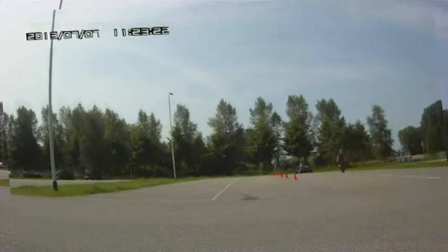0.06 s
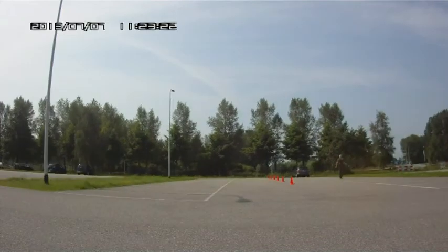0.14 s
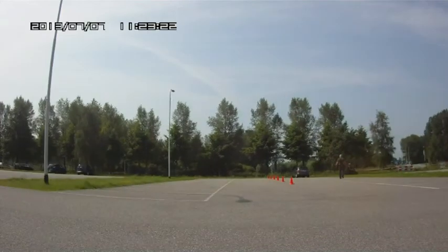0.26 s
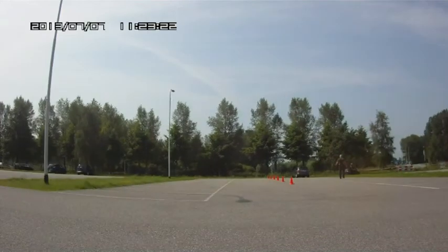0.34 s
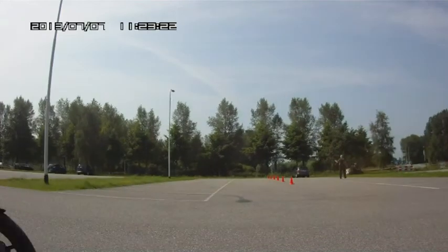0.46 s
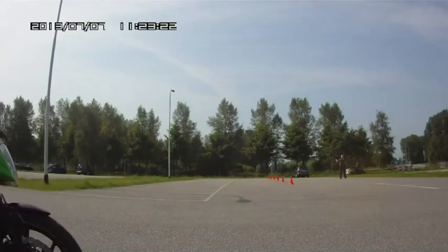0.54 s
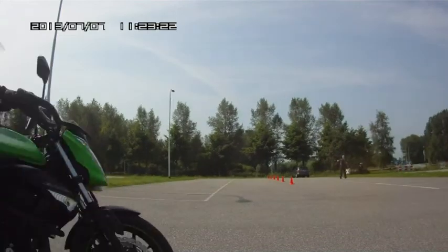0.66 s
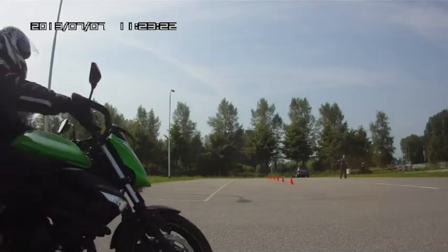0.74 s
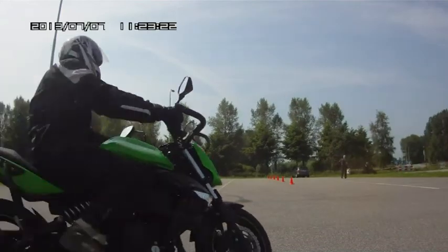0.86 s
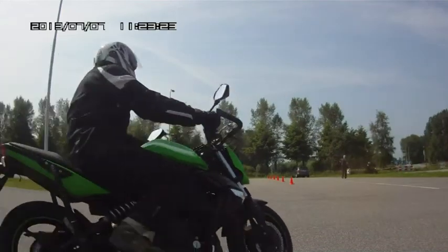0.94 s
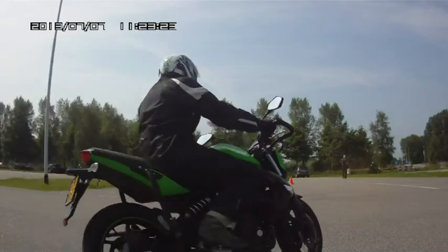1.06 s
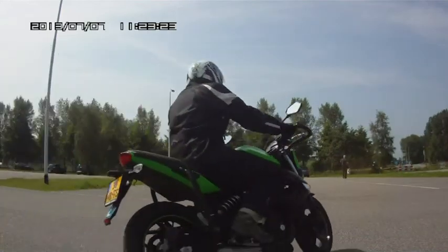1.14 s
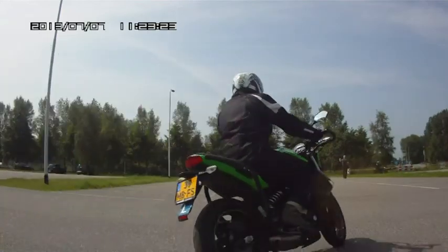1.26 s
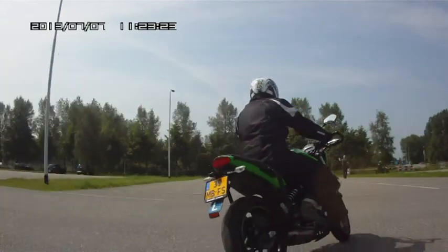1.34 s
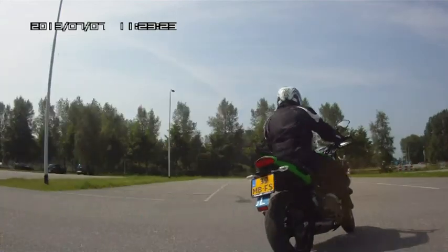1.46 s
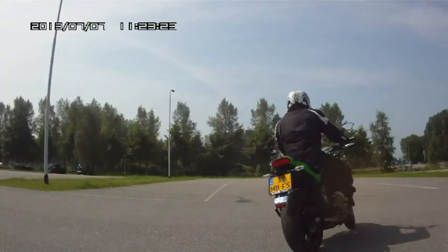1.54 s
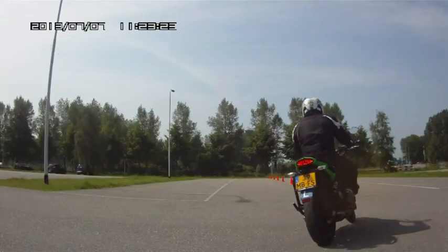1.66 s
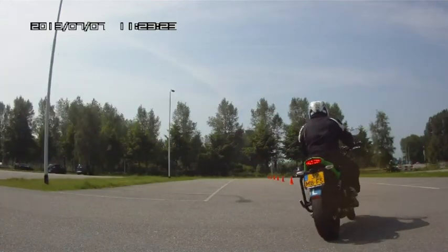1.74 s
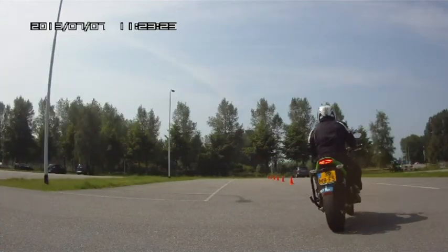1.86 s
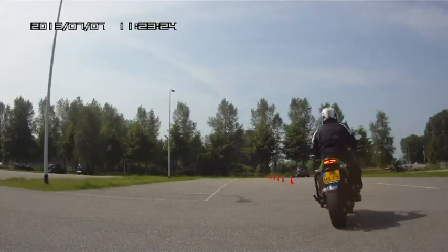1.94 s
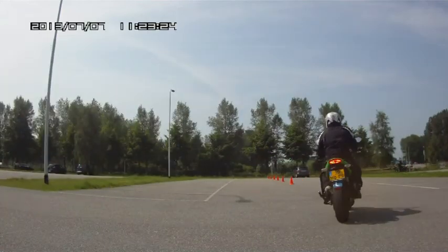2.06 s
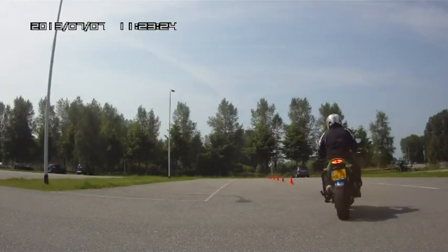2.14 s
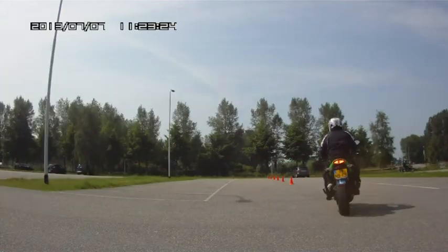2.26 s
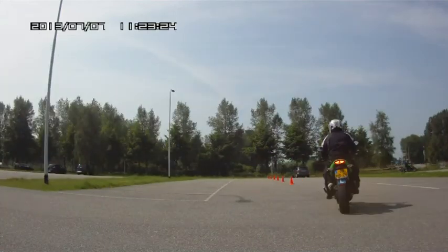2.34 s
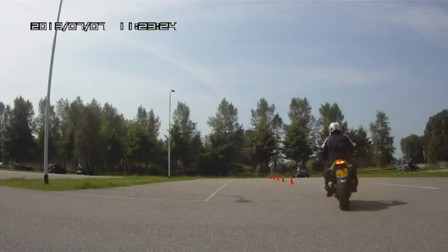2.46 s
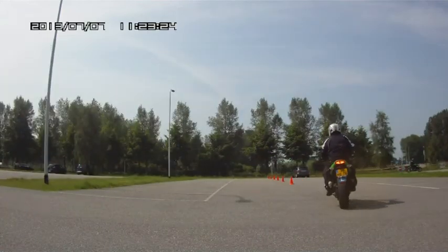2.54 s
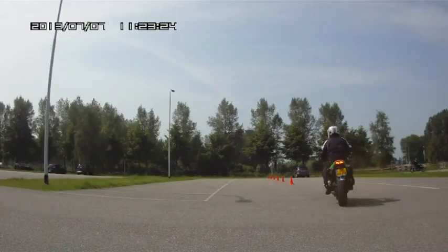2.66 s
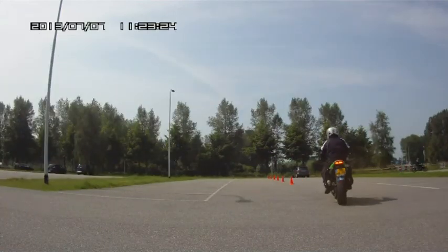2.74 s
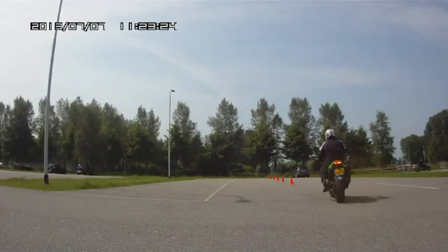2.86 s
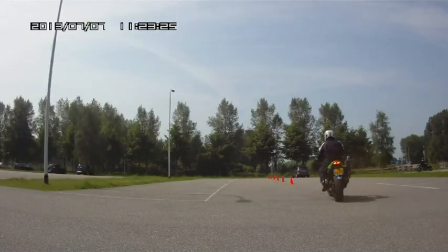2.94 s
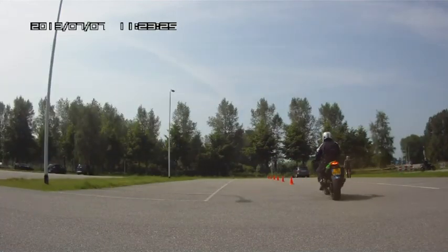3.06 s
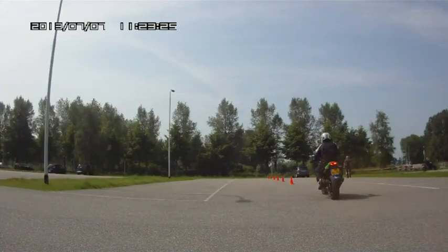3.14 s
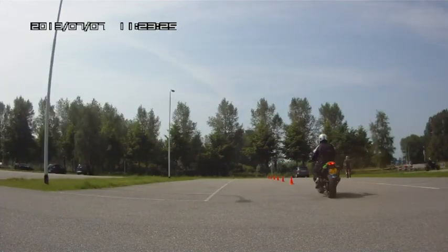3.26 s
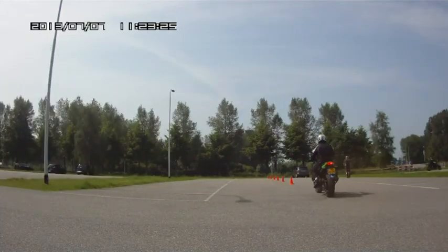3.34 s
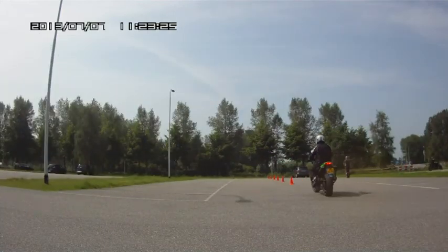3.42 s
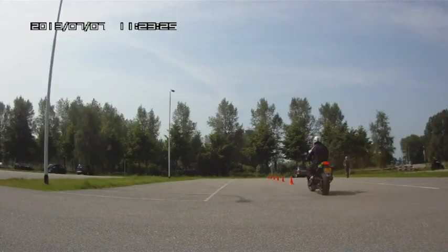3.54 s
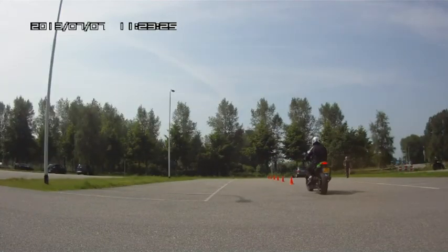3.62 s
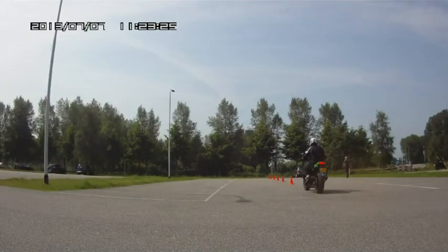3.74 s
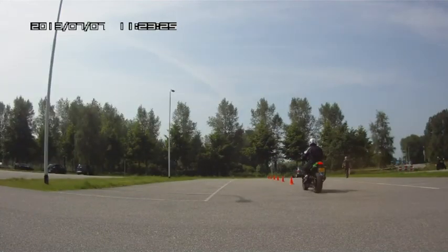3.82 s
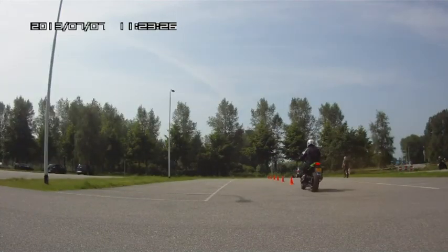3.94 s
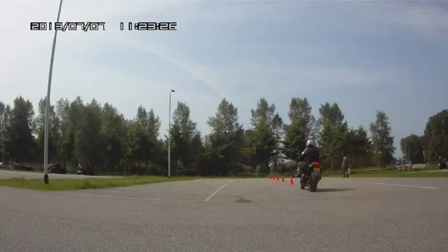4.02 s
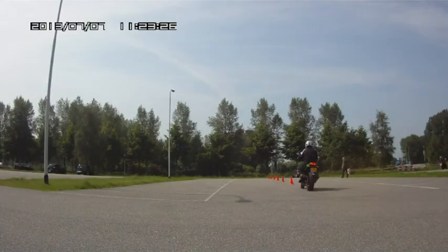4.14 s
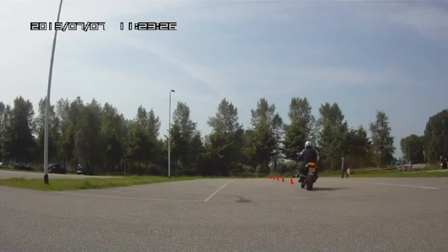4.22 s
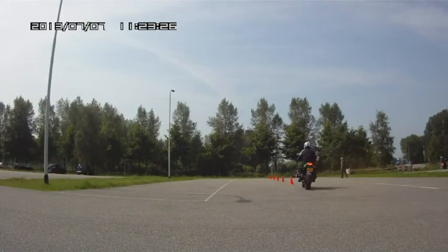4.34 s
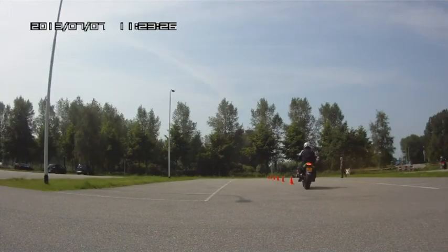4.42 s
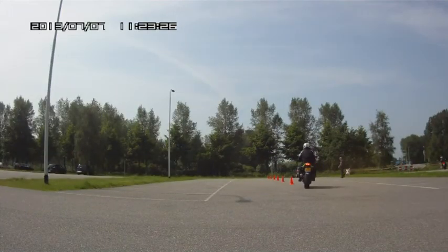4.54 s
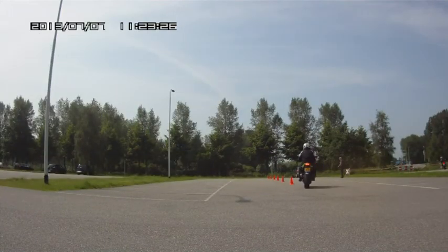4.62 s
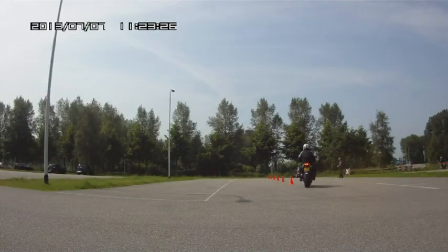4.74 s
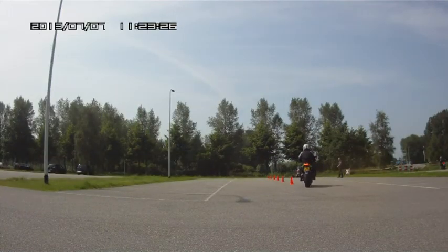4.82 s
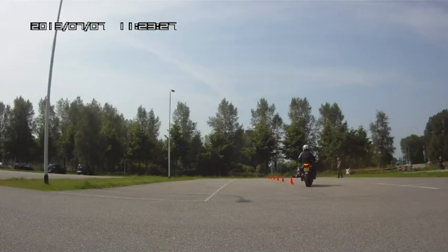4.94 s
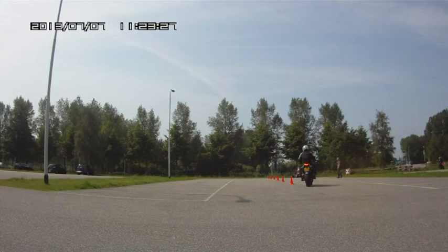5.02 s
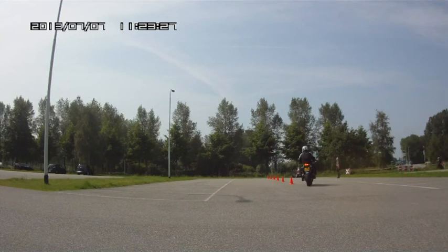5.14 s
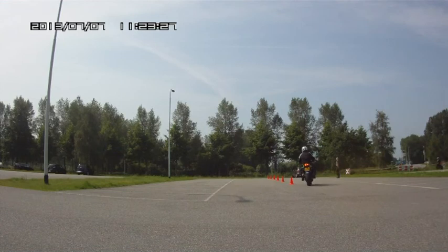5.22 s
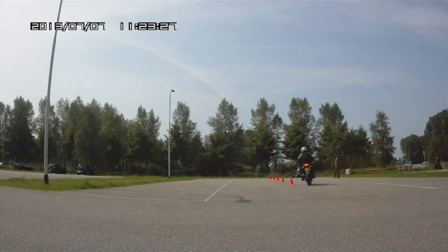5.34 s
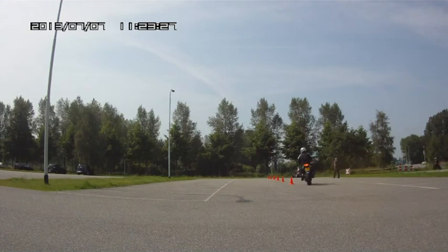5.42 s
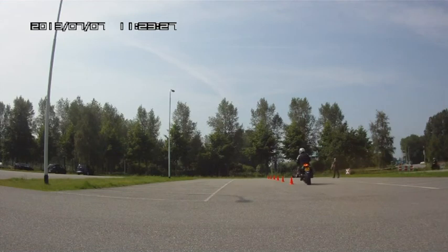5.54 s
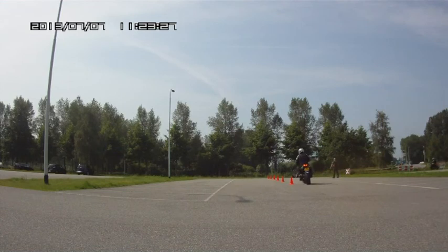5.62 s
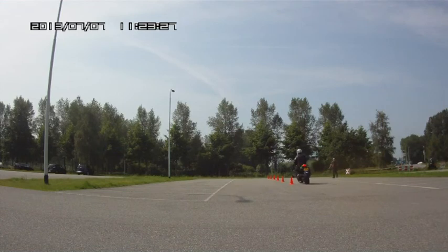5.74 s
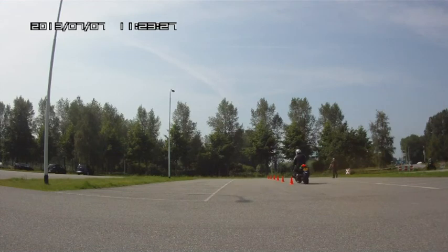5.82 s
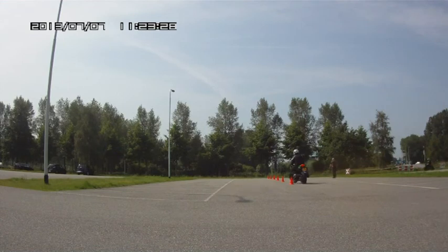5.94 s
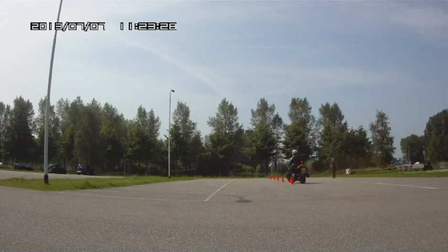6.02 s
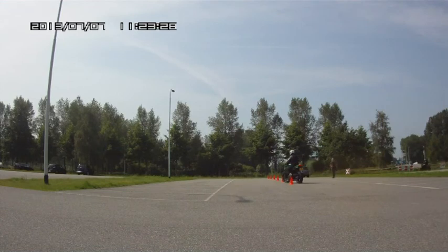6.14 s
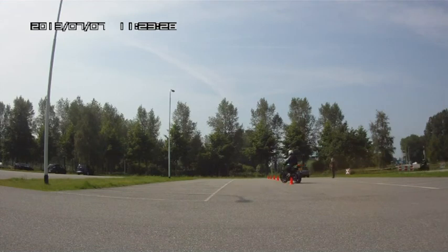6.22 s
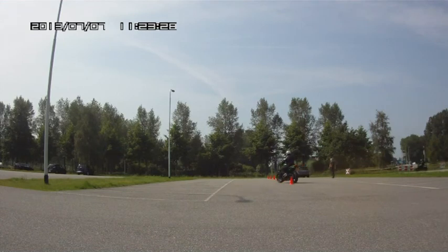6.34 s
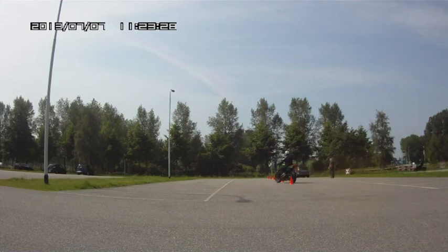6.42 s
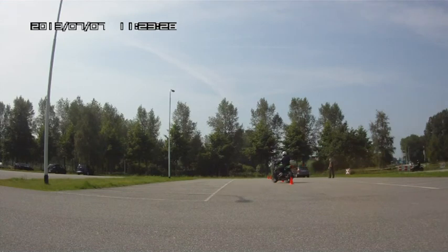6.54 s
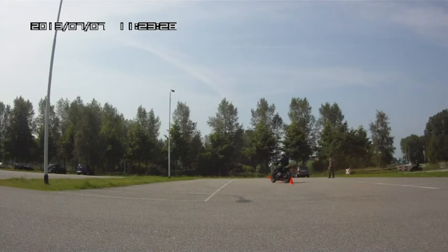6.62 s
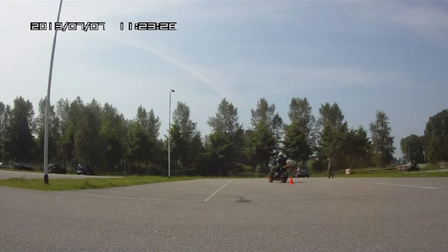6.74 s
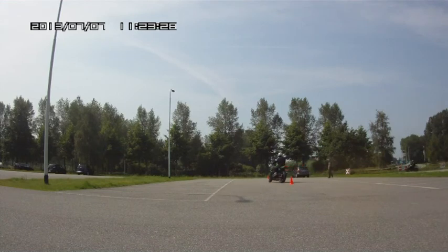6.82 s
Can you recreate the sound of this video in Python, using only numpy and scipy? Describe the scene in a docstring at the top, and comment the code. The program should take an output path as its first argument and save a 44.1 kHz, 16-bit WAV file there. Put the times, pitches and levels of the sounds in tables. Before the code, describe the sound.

A parallel-twin motorcycle rolls past within a metre or so at idle, its paired exhaust pulses booming low, with valve ticking, chain rattle, a brief drive whirr and a hissing chuff from the outlet. It then accelerates away with a firmer, higher drone, shrinks with distance and eases off. Light wind, far traffic and faint hiss surround it; one tiny whistle passes. Single fixed microphone, outdoors, nearly dry with a faint echo from trees.

```python
"""A parallel-twin motorcycle rolls past at idle, a metre or so away on an open car park, then pulls off.
Its two cylinders fire about a quarter of a cycle apart, then rest: their puffs boom in the silencer,
ring the pipe and, near the outlet, chuff. Valve gear and chain are shaped noise; the drive whirrs.
Trees return a faint echo. Far traffic, light wind, hiss and thin steady whines lie underneath;
one faint whistle, a gliding sine, passes over them."""
import sys
import numpy as np
from scipy import signal
from scipy.fft import rfft, irfft
from scipy.io import wavfile
from scipy.ndimage import uniform_filter1d

SR = 44100
rng = np.random.default_rng(int(sys.argv[2]) if len(sys.argv) > 2 else 0)


def put_to_file(sound):
    """Save the sound as 16-bit audio at rate SR, in the file named by the first command-line argument."""
    columns = np.atleast_2d(sound).T  # one column per channel
    safe = np.clip(columns, -1, 1)
    whole_steps = np.round(safe * 32767)
    wavfile.write(sys.argv[1], SR, whole_steps.astype(np.int16))


N = 303408
TIME = np.arange(N) / SR


def undb(db):
    """Decibels to gain."""
    return 10 ** (np.asarray(db) / 20)


def curves(table):
    """The columns of a table, joined by straight lines in time."""
    s, *columns = np.transpose(table)
    return [np.interp(TIME, s, column) for column in columns]


def level(x, db):
    """Set the overall rms level."""
    return x * undb(db) / np.sqrt(np.mean(x ** 2))


def ride(x, db):
    """Make the level over a few engine cycles follow a curve."""
    size = SR // 5
    power = uniform_filter1d(uniform_filter1d(x ** 2, size), size)
    return x * undb(db) / np.sqrt(power + 1e-18)


def cut(x, hz, kind, order=4):
    """Low-pass or high-pass."""
    return signal.sosfilt(signal.butter(order, hz, kind, fs=SR, output="sos"), x)


def ring(x, modes):
    """Resonances side by side, each with a pitch, a width and a gain."""
    return sum(undb(db) * signal.lfilter(*signal.iirpeak(hz, hz / width, SR), x) for hz, width, db in modes)


def colour(x, points):
    """Shape a sound by a spectrum of pitch and gain points, joined on a log-frequency scale."""
    hz, db = np.transpose(points)
    bins = np.arange(N // 2 + 1) * SR / N
    gain_db = np.interp(np.log(bins + 1), np.log(hz), db)
    return irfft(rfft(x) * undb(gain_db), N)


def walk(rate):
    """Slow random drift of unit rms, with new values drawn at the given rate in Hz."""
    size = int(SR / rate)
    held = np.repeat(rng.standard_normal(N // size + 1), size)
    smooth = uniform_filter1d(uniform_filter1d(held, size), size)
    return level(smooth[:N], 0)


def swells(table):
    """Smooth rises and dips, each with a moment, a half length and a height."""
    return sum(height * np.exp(-.5 * ((TIME - s) / half) ** 2) for s, half, height in table)


def passing(when_s, side_m):
    """Distance in metres along a straight path, and how far the bike faces away (-1 coming, 1 going)."""
    roll_m_per_s = 2.51
    along = roll_m_per_s * (TIME - when_s)
    distance = np.hypot(along, side_m)
    return distance, along / distance


# when each part is nearest, and its distance then: nearest_s, side_m
BLOCK_PASS, OUTLET_PASS = (0.66, 0.9), (0.77, 1.55)


def heard_db(part, path, throttle):
    """A part grows louder with the throttle, beams forward or back, and fades with distance."""
    shut_db, throttle_db, behind_db = part
    distance, away = passing(*path)
    return shut_db + throttle_db * throttle + behind_db * away - 20 * np.log10(distance)


def puff(age, width):
    """A quick rise and slower fall, of about unit area."""
    return age / width ** 2 * np.exp(-age / width)


def firings(cycle, opens, jitter, scatter_db):
    """Share of a cycle since one event, such as a valve opening, and that event's uneven strength."""
    turn = cycle - opens + jitter * walk(30) + 1
    strength = undb(scatter_db * rng.standard_normal(256))
    return turn % 1, strength[turn.astype(int)]


# two cylinders: exhaust_opens_share (of a cycle), boom_db, bark_db
CYLINDERS = [(.168, 0, -1), (.409, -.4, 0)]
# silencer chamber resonances: pitch_hz, width_hz, gain_db
SILENCER_MODES = [(99, 23.6, 2.5), (66, 42, -33)]
# treble loss in the silencer packing: pitch_hz, gain_db
PACKING_LOSS = [(135, 2.5), (170, -5), (260, -18.5)]
# slow suction through the airbox: pitch_hz, width_hz, gain_db
INTAKE_MODES = [(21.6, 16.6, -15.5)]


def boom(cycle, load, blow_width=0.024, stroke=3.16, stroke_lag=0.2283, stroke_width=0.066):
    """Each cylinder blows down, then its piston pushes out the rest; the silencer swings with the flow."""
    # under load there is more gas, and it leaves earlier and in a shorter push; widths are shares of a cycle
    amount = stroke + 0.31 * load
    lag, width = stroke_lag - 0.025 * load, stroke_width - 0.013 * load
    flow = 0
    for opens, db, _ in CYLINDERS:
        age, strength = firings(cycle, opens, jitter=0.00079, scatter_db=1.0)
        push = np.exp(-.5 * ((age - lag) / width) ** 2) / (width * np.sqrt(2 * np.pi))
        flow = flow + undb(db) * (strength * puff(age, blow_width) + amount * push)
    flow = flow - np.mean(flow)
    exhaust = colour(ring(flow, SILENCER_MODES), PACKING_LOSS)
    return exhaust - ring(flow, INTAKE_MODES)  # the intake draws in what the exhaust blows out


# pipe resonances: pitch_hz, width_hz, gain_db
PIPE_MODES = [(194, 19, -15.5), (227, 39.7, 0), (328.2, 69, -4), (450, 150, -13.5), (492.5, 16.2, 11.5),
              (547, 15, -6.5), (673, 29, -1.5), (742, 15, -5.5)]
# rush of gas at the outlet: pitch_hz, gain_db
GAS_COLOUR = [(170, -1), (230, 10), (280, -2.5), (330, 5), (380, -3.5), (440, 4.5), (470, 2), (495, 6.5),
              (525, -2.5), (560, 8.5), (630, -1.5), (710, 8.5), (850, -20)]


def bark(cycle, load, idle_gas_db=-3.5, load_gas_db=-11, idle_sharp=0.41):
    """The steep front of each puff rings the pipe; turbulent gas follows, and counts most at low load."""
    fronts, gate = 0, 0
    for opens, _, db in CYLINDERS:
        age, strength = firings(cycle, opens, jitter=.0014, scatter_db=1.0)
        fronts = fronts + undb(db) * strength * puff(age, .007)
        gate = gate + undb(db) * strength * puff(age, width=0.22)
    gas_db = idle_gas_db + load * (load_gas_db - idle_gas_db)
    gas = level(colour(gate * rng.standard_normal(N), GAS_COLOUR), gas_db)
    pipe = ring(fronts - np.mean(fronts), PIPE_MODES)
    soft = cut(pipe, hz=317, kind="low", order=2)
    sharp = idle_sharp + (1 - idle_sharp) * load  # weak idle firings have rounder fronts
    pipe = ride(soft + sharp * (pipe - soft), 0)
    return cut(cut(pipe + gas, hz=688, kind="low", order=6), hz=197, kind="high")


def clatter(cycle, tick_width=0.043, tick_db=-3):
    """Eight valve seatings a cycle tick over the steady churn of chain and gears."""
    gate = 0
    for opens in np.arange(8) / 8:
        age, strength = firings(cycle, opens, jitter=.006, scatter_db=3.0)
        gate = gate + strength * puff(age, tick_width)
    return (0.5 + level(gate, tick_db)) * rng.standard_normal(N)


# engine casing resonances: pitch_hz, width_hz, gain_db
CASING_MODES = [(800, 210, 6.5), (1086, 120, -5.5), (1229, 53, 3), (1323, 40, -1.5), (1430, 63, -3),
                (1530, 73, -4)]


def casing_knock(cycle):
    """The clatter shakes the engine casing, which rings in the middle of the spectrum."""
    return cut(ring(clatter(cycle), CASING_MODES), hz=1566, kind="low")


# ringing of valve gear and chain: pitch_hz, width_hz, gain_db
RATTLE_MODES = [(2050, 60, -37), (2380, 24, 3), (2596, 310, 3), (3264, 400, 4.5), (3840, 190, 2),
                (4200, 105, 2.5), (5060, 400, -8.5), (5900, 900, -15)]


def chain_rattle(cycle):
    """Valve gear and chain ring brightly under the same kind of clatter."""
    return cut(ring(clatter(cycle), RATTLE_MODES), hz=6470, kind="low", order=2)


# the whirr comes and goes: centre_s, half_length_s, added_db
WHIRR_SWELLS = [(.11, 0.078, 14), (.87, 0.18, 15), (1.45, 0.23, 11), (3.5, .5, 13)]


def whirr():
    """A lightly damped part of the drive rings as the gears churn."""
    churn = ring(rng.standard_normal(N), [(1371, 105, 0)])
    return level(ring(churn, [(1367, 150, 0)]), 0) * undb(swells(WHIRR_SWELLS))


# the gas jet is heard only as the outlet sweeps by: centre_s, half_length_s, gain_share
JET_SWEEP = [(1.0, 0.19, 0.98)]


def jet(cycle, lag=0.11, width=.065, before_sweep_db=-52.0):
    """The second puff of each pair leaves the outlet as a short, hissing chuff."""
    age, strength = firings(cycle, CYLINDERS[1][0], jitter=.004, scatter_db=2.0)
    gate = strength * np.exp(-.5 * ((age - lag) / width) ** 2)
    hissing = ring(ring(gate * rng.standard_normal(N), [(734, 140, 0)]), [(730, 240, 0)])
    return level(hissing, before_sweep_db) * swells(JET_SWEEP)


# how loud each part is: level_db (at 1 m, throttle shut, side on), full_throttle_added_db, behind_added_db
BOOM, BARK = (-21.5, 7.4, 0.46), (-40.5, 16.36, 2.57)
CLATTER, CHAIN, WHIRR = (-52.5, 2, -1.16), (-64, 3.1, -0.92), (-67.5, 0, -4.5)
# engine speed: start_s, four_stroke_cycles_hz
ENGINE_SPEED = [(0.0, 15.263), (0.69, 15.584), (1.8, 15.117), (2.18, 15.659), (2.39, 16.759),
                (2.55, 20.427), (2.68, 21.327), (3.4, 20.844), (3.78, 20.171), (4.16, 21.204),
                (4.54, 23.668), (4.86, 24.077), (5.29, 23.296), (5.94, 17.85), (6.24, 17.018),
                (6.57, 17.26), (6.88, 18.786)]
# the rider pulls away, gives a little more, then rolls off: start_s, throttle_share
THROTTLE = [(1.75, 0.26), (2.35, 0.42), (2.53, .75), (3.05, 0.73), (3.75, .85), (4.3, 0.78), (4.52, 1),
            (5.2, 0.87), (5.45, 0.67), (5.85, 0.41), (6.88, .37)]
# the firings gain their edge as the engine speeds up: four_stroke_cycles_hz, load_share
LOAD = [(15.5, 0), (19.5, 0.96)]
# the boom swells and dips as the bike slows into a turn (level only): centre_s, half_length_s, added_db
BOOM_SWELLS = [(5.55, .13, -1.5), (5.92, 0.17, 3.5), (6.42, .12, -4.5), (6.7, 0.16, 4.5)]


def motorcycle():
    """Crank-locked exhaust and clatter plus a free whirr; throttle sets strength, engine speed the edge."""
    hz, = curves(ENGINE_SPEED)
    throttle = np.clip(curves(THROTTLE)[0], 0, 1)
    cycle = np.cumsum(hz) / SR
    load = np.clip(np.interp(hz, *np.transpose(LOAD)), 0, 1)
    silencer = ride(boom(cycle, load), heard_db(BOOM, OUTLET_PASS, throttle) + swells(BOOM_SWELLS))
    pipe = ride(bark(cycle, load), heard_db(BARK, OUTLET_PASS, throttle))
    casing = ride(casing_knock(cycle), heard_db(CLATTER, BLOCK_PASS, throttle))
    rattle = ride(chain_rattle(cycle), heard_db(CHAIN, BLOCK_PASS, throttle))
    drive = whirr() * undb(heard_db(WHIRR, BLOCK_PASS, throttle))
    return silencer + pipe + casing + rattle + drive + jet(cycle)


def tree_line(x, lag_s=0.43, t60=0.61, db=-54):
    """A faint, dull, scattered echo from trees around the car park, with the bike's distance undone."""
    t = TIME[:SR]
    scatter = cut(rng.standard_normal(SR), hz=910, kind="low", order=2)
    echo = scatter * undb(-60 * t / t60) * np.clip(t / lag_s, 0, 1)
    distance, _ = passing(*OUTLET_PASS)
    return level(signal.fftconvolve(x * distance, echo)[:N], db)


# far traffic: pitch_hz, gain_db
TRAFFIC_COLOUR = [(40, 9.5), (120, -15), (250, -4.5), (500, 13.5), (900, -10.5), (1500, -23.5), (3000, -39),
                  (6000, -44)]
# light wind: pitch_hz, gain_db
WIND_COLOUR = [(6, -23), (14, 1), (28, -19), (45, -9), (70, -7.5), (110, -12.5), (200, -22), (500, -36.5),
               (2000, -85)]
# even hiss: pitch_hz, gain_db
HISS_COLOUR = [(100, 13.5), (2000, -0.5), (5000, -1), (9000, -0.6), (14000, 0.5), (16000, -1.5)]
# thin steady whines: pitch_hz, level_db (rms)
WHINE_TONES = [(6476, -95), (6525, -86.5), (7811, -87.5), (9098, -86)]


def background():
    """Shaped noise for slowly swelling traffic, wind with one gust, and hiss; steady sines for whines."""
    traffic = level(colour(rng.standard_normal(N), TRAFFIC_COLOUR), -54) * undb(1.0 * walk(2.82))
    gust_db = swells([(4.7, 1.65, 5.8)])  # one broad rise: centre_s, half_length_s, added_db
    wind = level(colour(rng.standard_normal(N), WIND_COLOUR), -48) * undb(gust_db)
    hiss = level(colour(rng.standard_normal(N), HISS_COLOUR), -64.0)
    whine = sum(np.sqrt(2) * undb(db) * np.sin(2 * np.pi * hz * TIME) for hz, db in WHINE_TONES)
    return traffic + wind + hiss + whine


# a faint far whistle that rises and falls: start_s, pitch_hz, level_db (rms)
WHISTLE_GLIDE = [(4.69, 703, -79), (4.72, 712, -59), (4.76, 848, -62), (4.8, 880, -64), (4.83, 830, -61),
                 (4.87, 740, -85)]


def whistle():
    """One short, nearly pure glide from far away: a sine with moving pitch and level."""
    hz, db = curves(WHISTLE_GLIDE)
    sounding = (TIME > WHISTLE_GLIDE[0][0]) & (TIME < WHISTLE_GLIDE[-1][0])
    return sounding * np.sqrt(2) * undb(db) * np.sin(2 * np.pi * np.cumsum(hz) / SR)


def scene():
    """The bike, its echo, the background and the whistle, in one channel."""
    bike = motorcycle()
    return (bike + tree_line(bike) + background() + whistle())[None]


def record(dry):
    """A very steep low-pass removes the extreme treble."""
    top_hz = 15350
    return signal.sosfilt(signal.ellip(10, .2, 80, top_hz, fs=SR, output="sos"), dry)


dry = scene()
out = record(dry)
put_to_file(out)
```